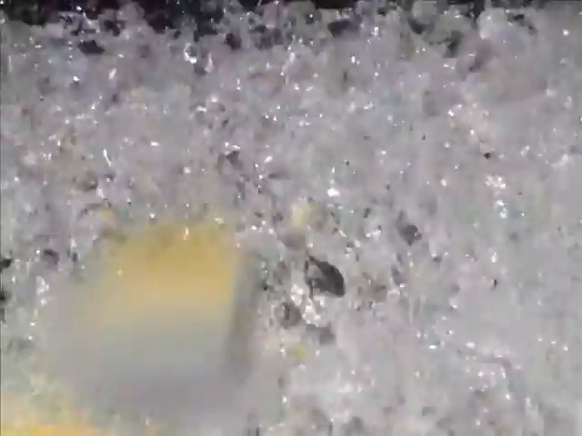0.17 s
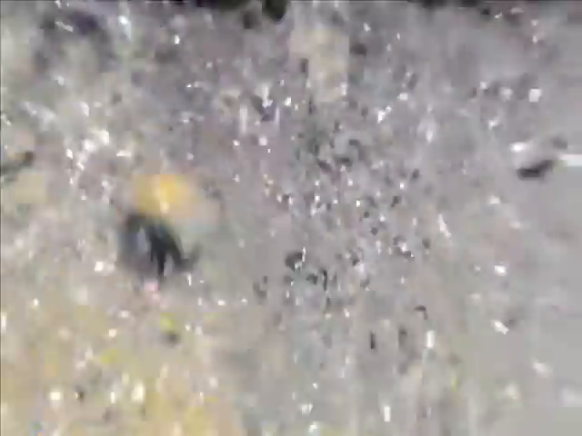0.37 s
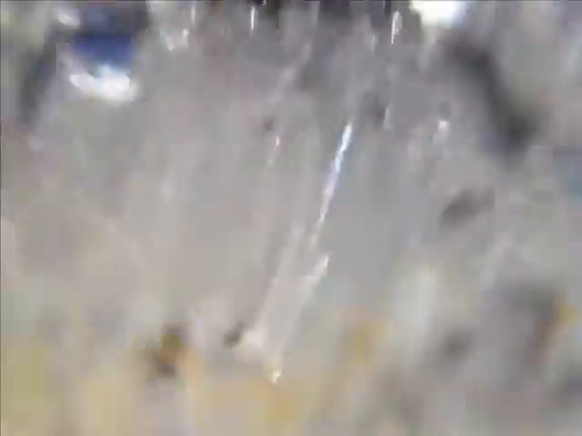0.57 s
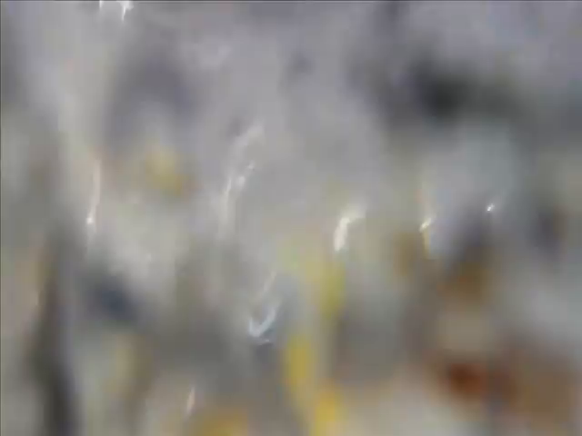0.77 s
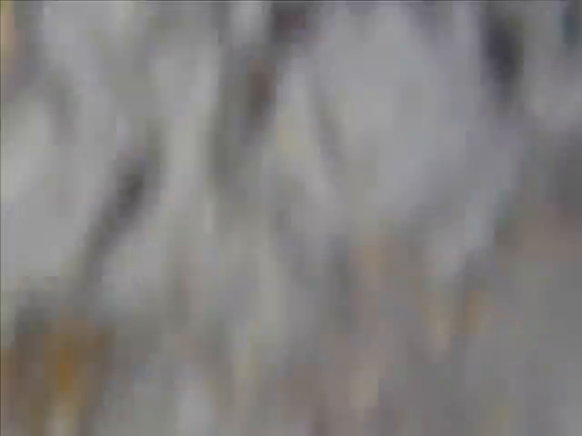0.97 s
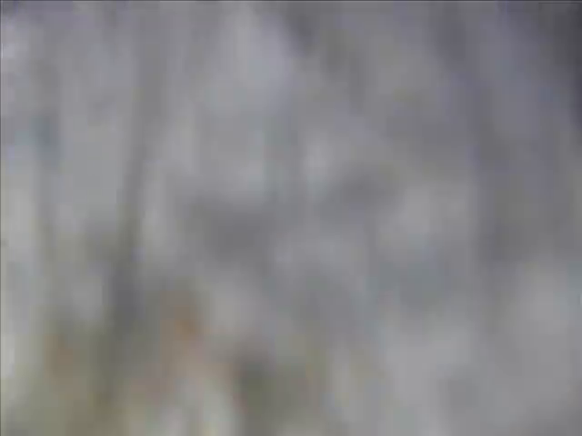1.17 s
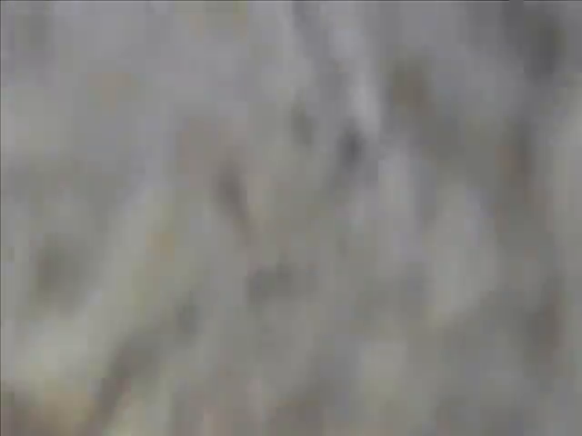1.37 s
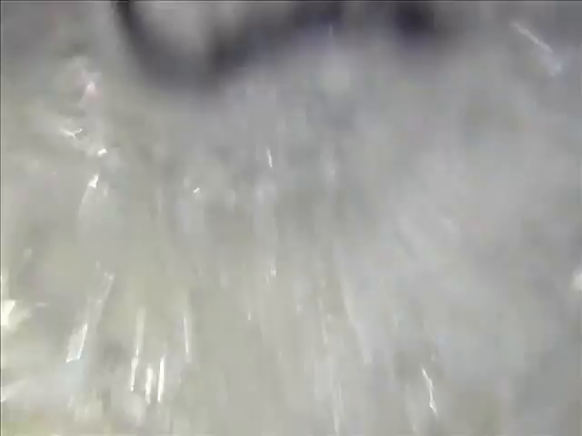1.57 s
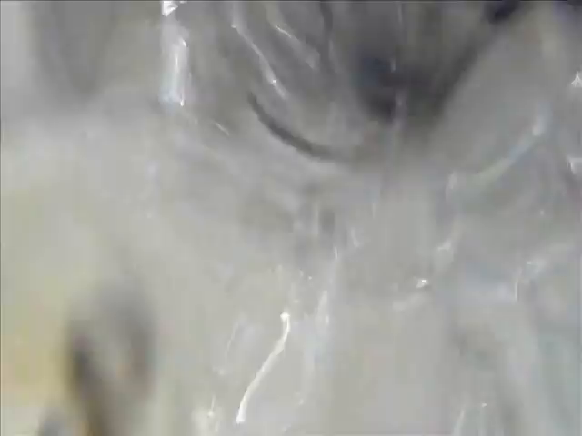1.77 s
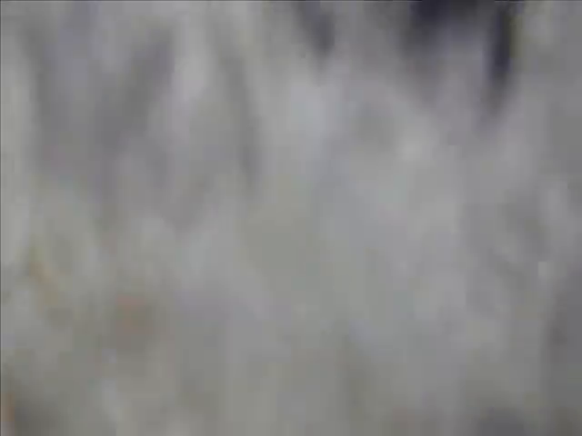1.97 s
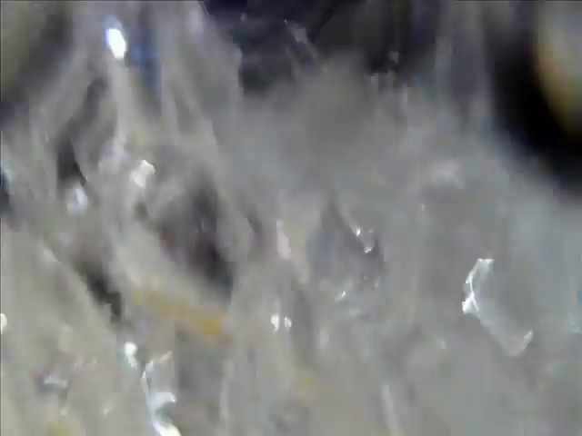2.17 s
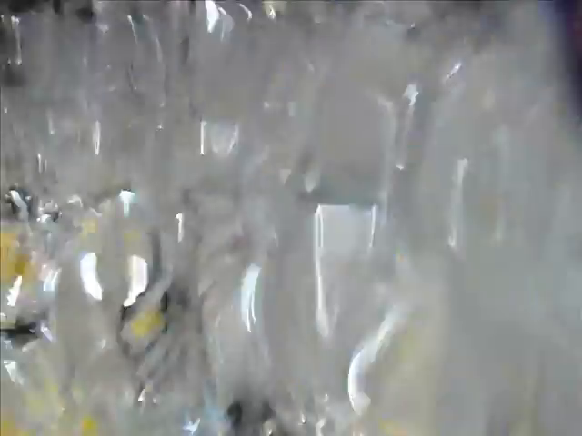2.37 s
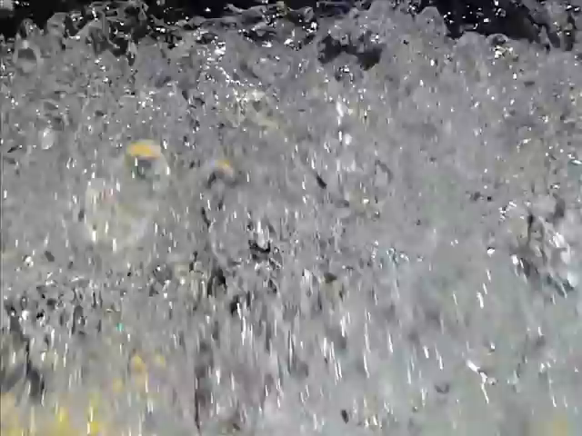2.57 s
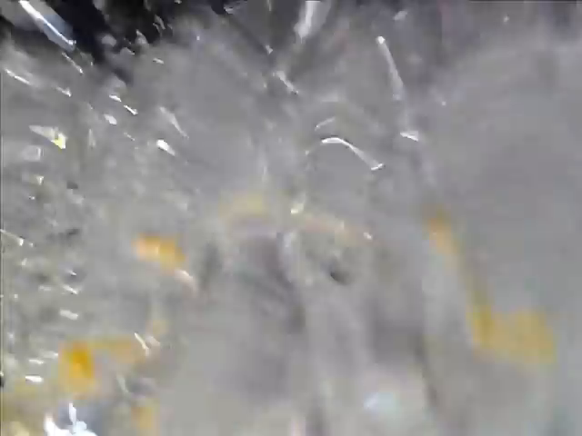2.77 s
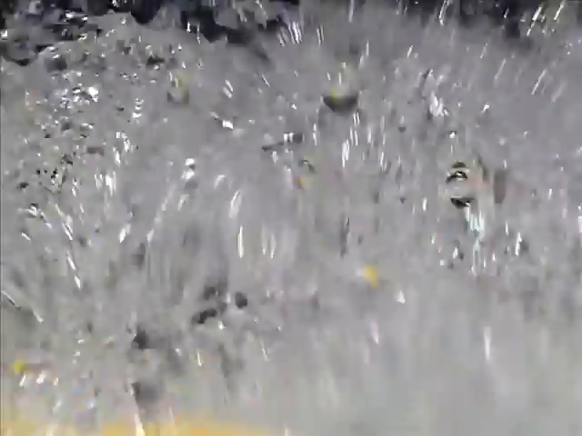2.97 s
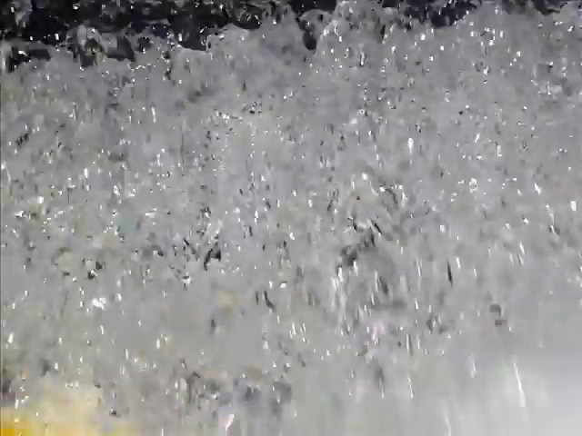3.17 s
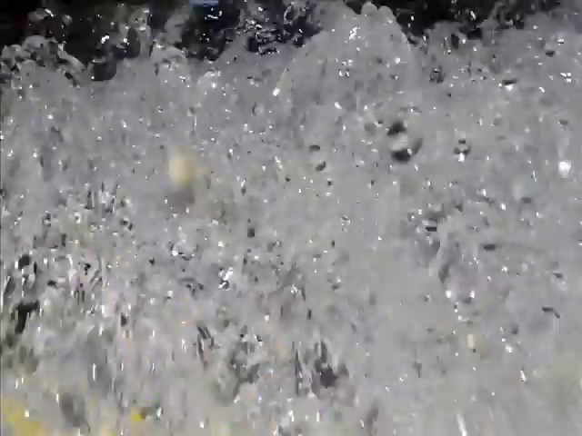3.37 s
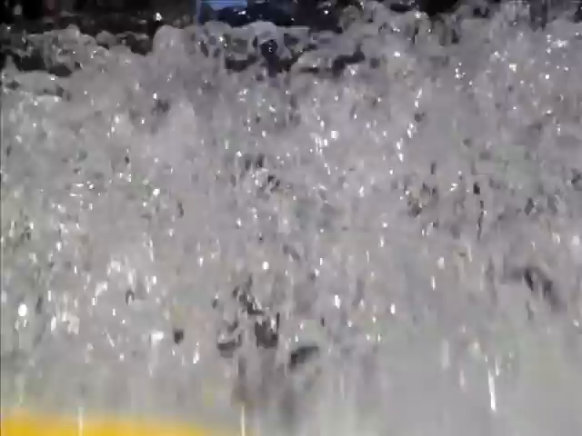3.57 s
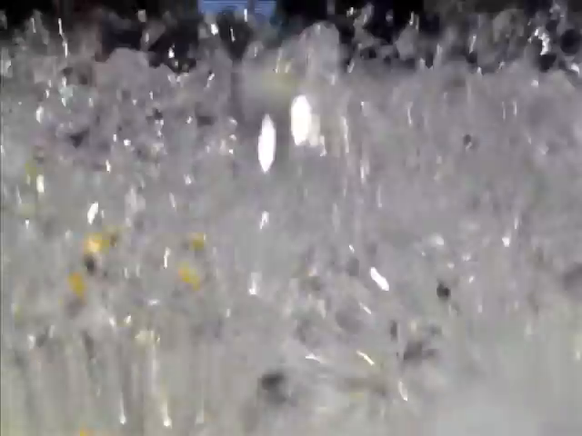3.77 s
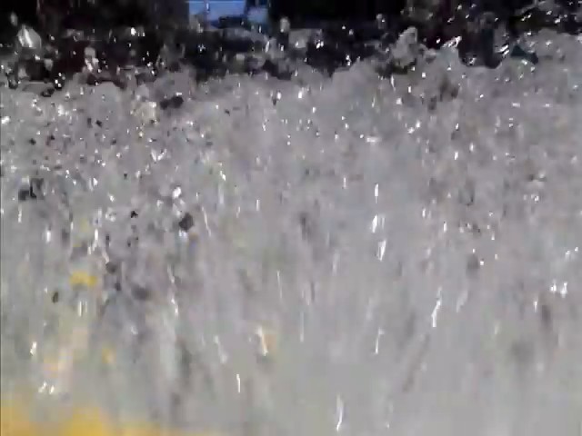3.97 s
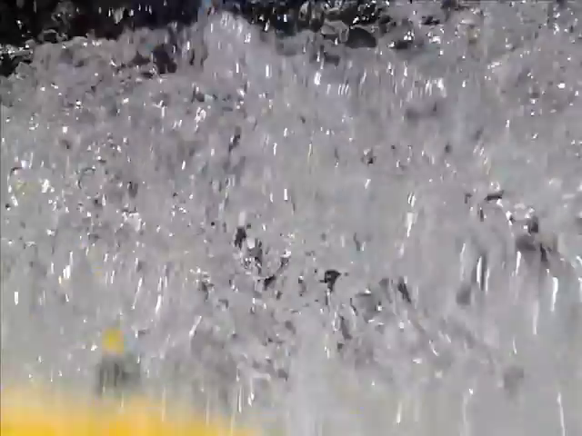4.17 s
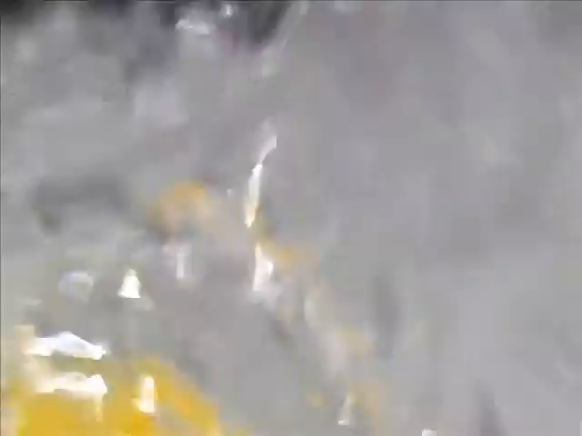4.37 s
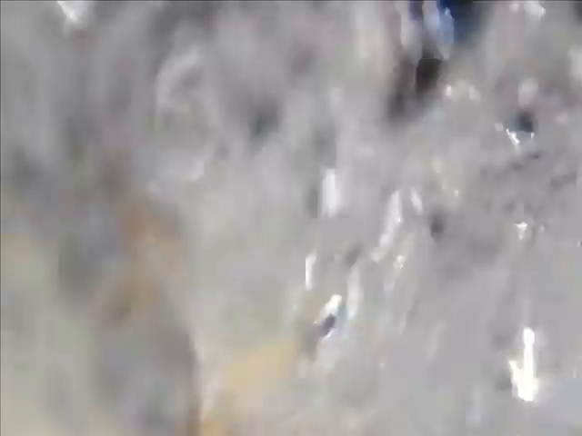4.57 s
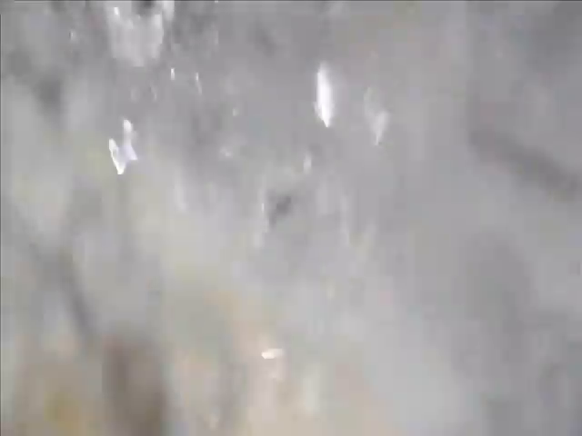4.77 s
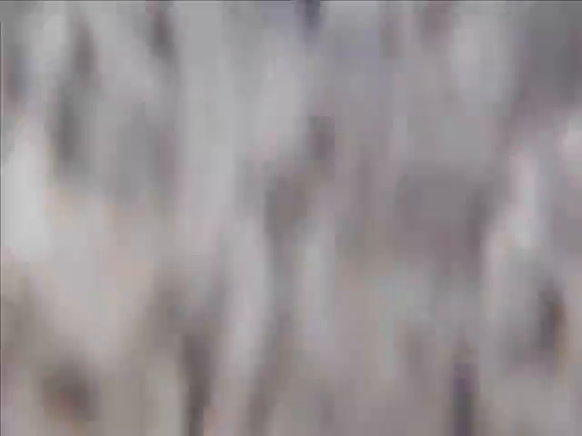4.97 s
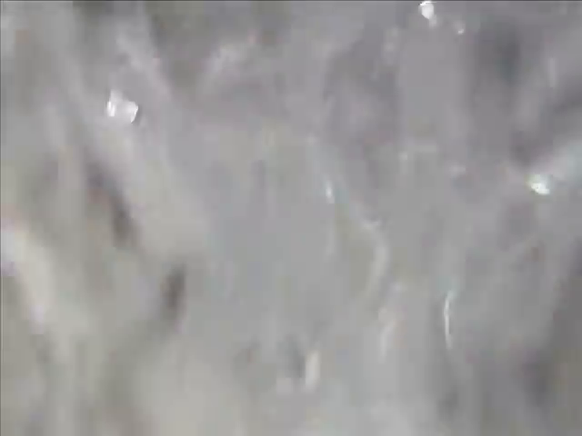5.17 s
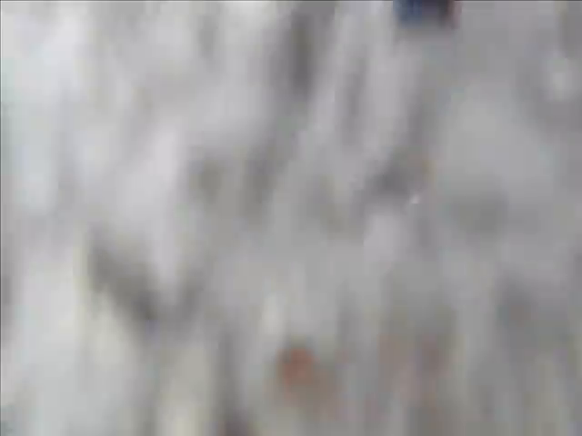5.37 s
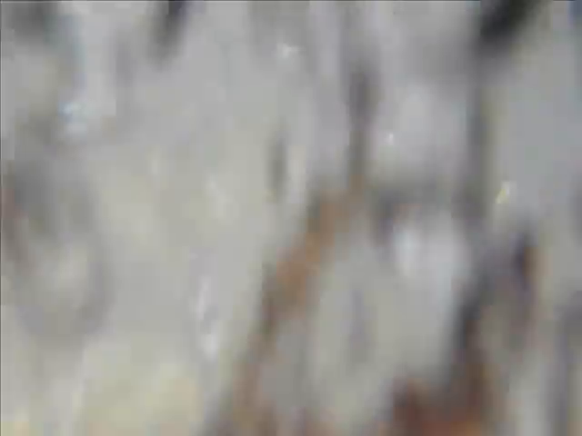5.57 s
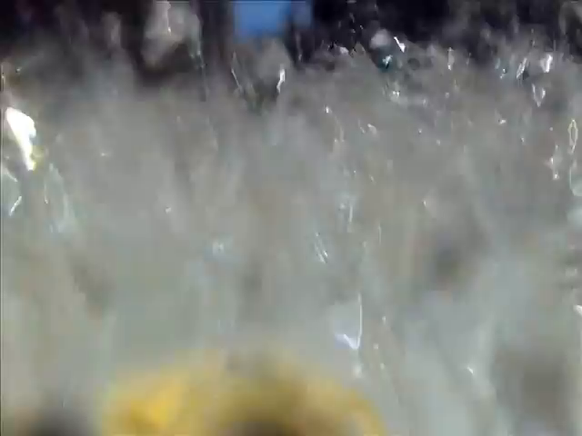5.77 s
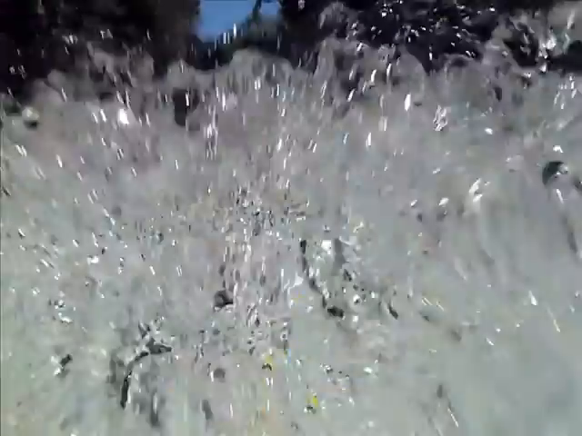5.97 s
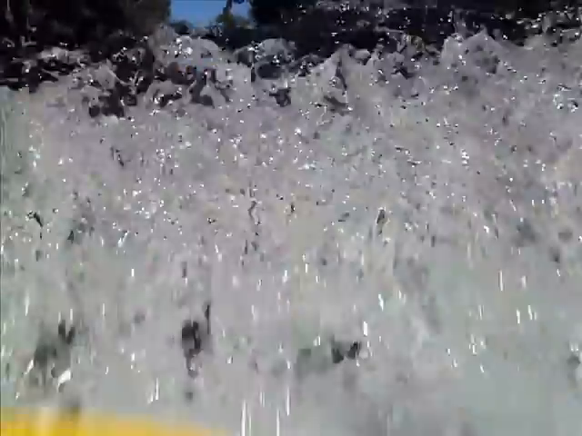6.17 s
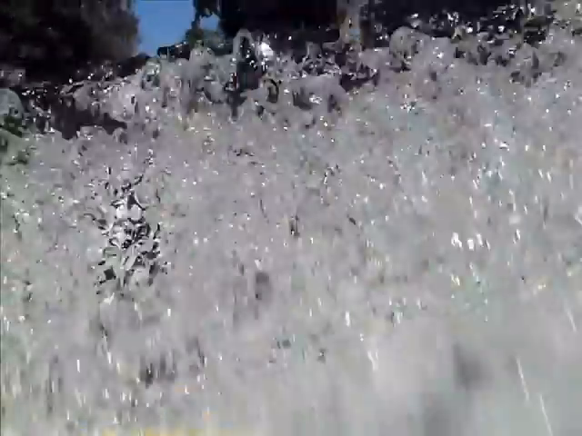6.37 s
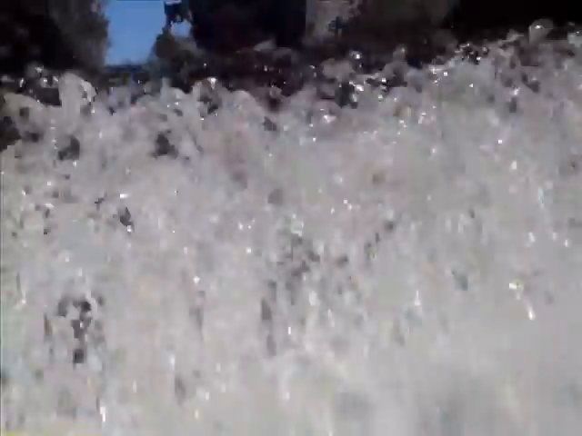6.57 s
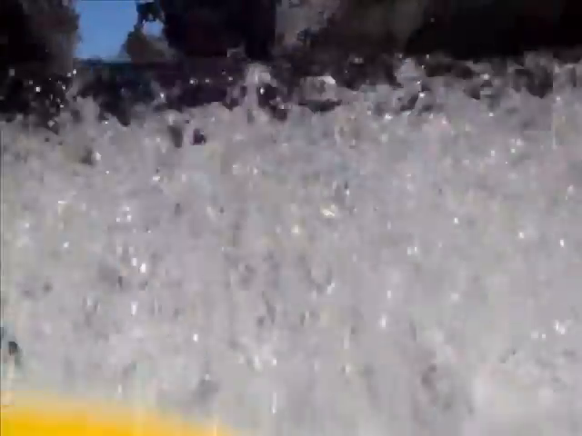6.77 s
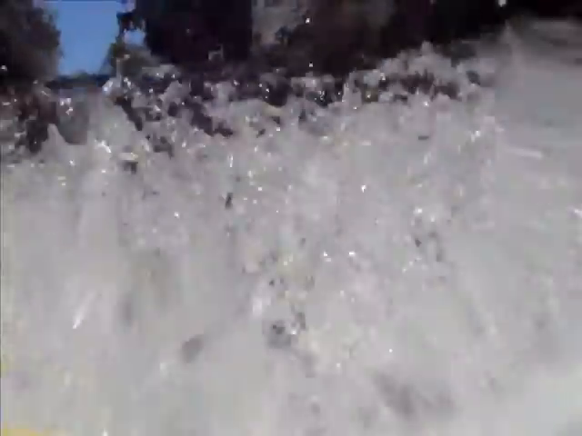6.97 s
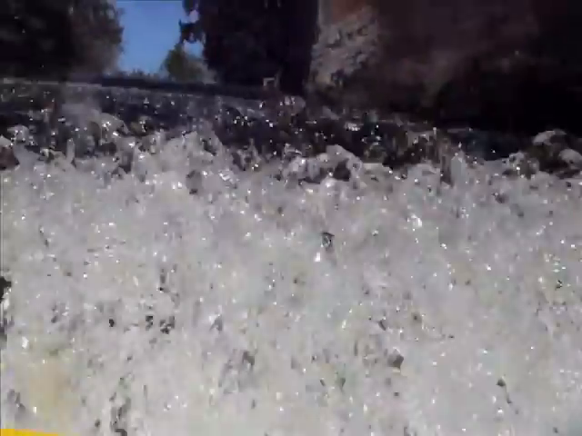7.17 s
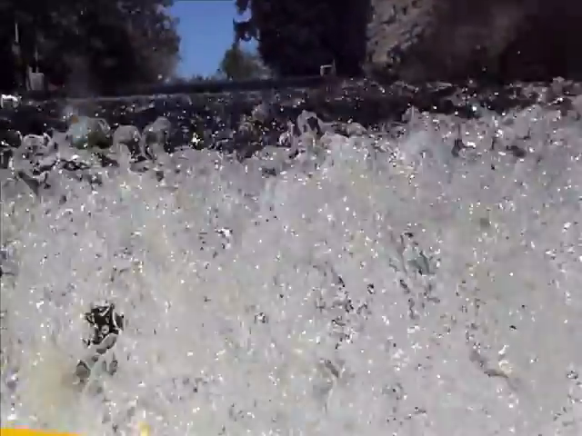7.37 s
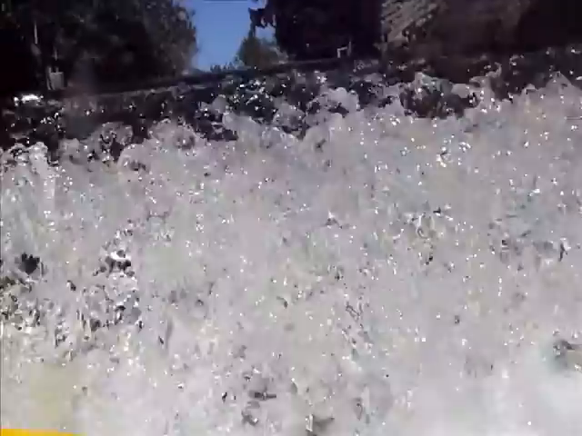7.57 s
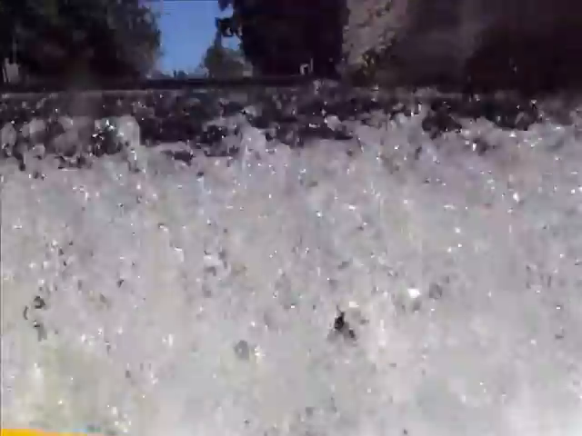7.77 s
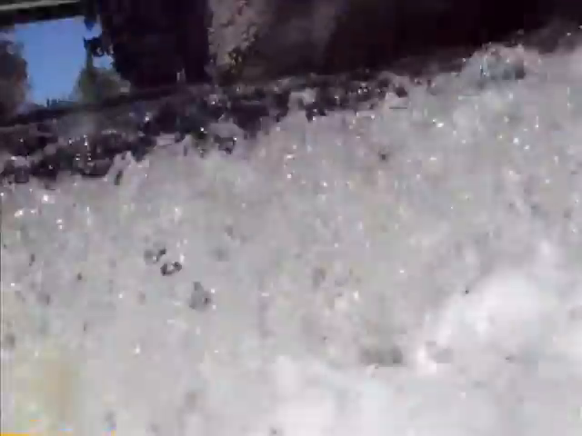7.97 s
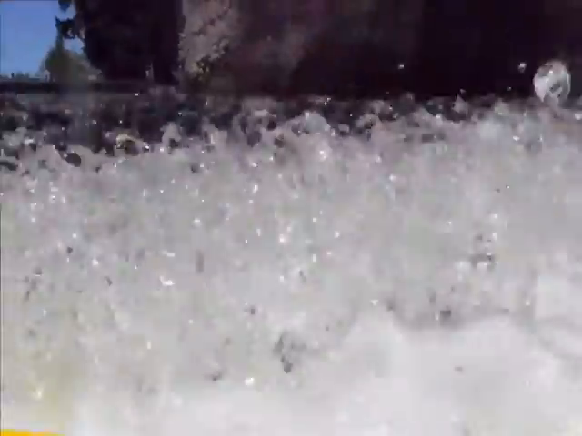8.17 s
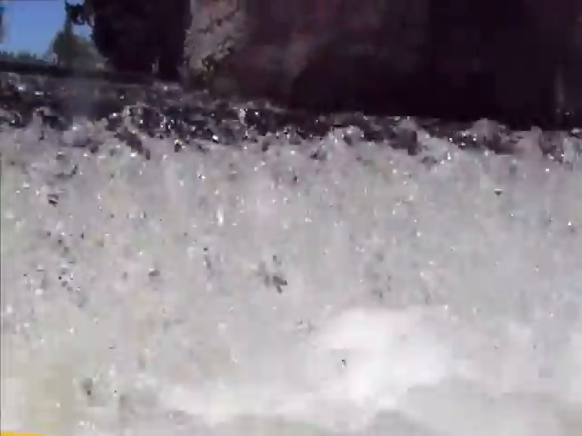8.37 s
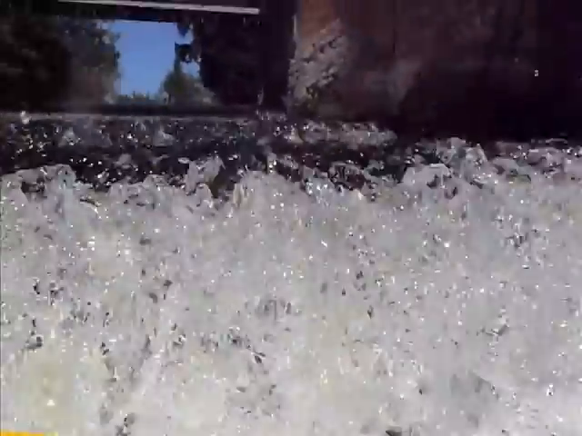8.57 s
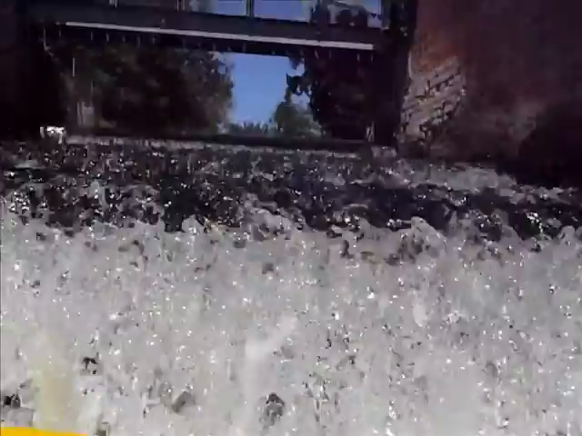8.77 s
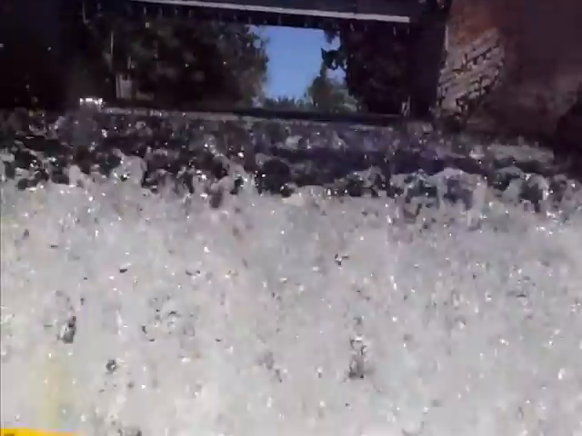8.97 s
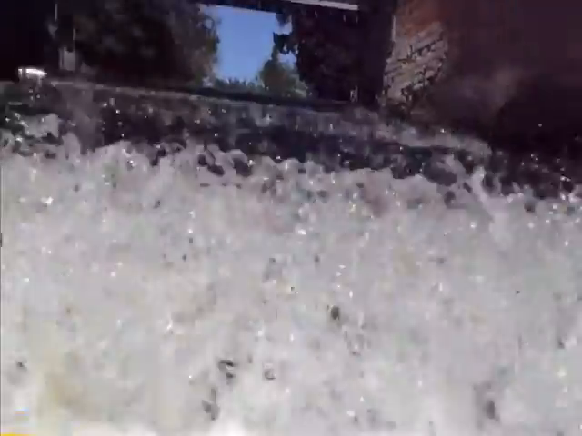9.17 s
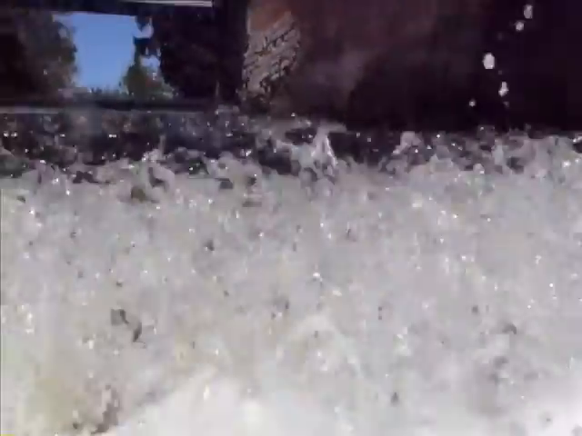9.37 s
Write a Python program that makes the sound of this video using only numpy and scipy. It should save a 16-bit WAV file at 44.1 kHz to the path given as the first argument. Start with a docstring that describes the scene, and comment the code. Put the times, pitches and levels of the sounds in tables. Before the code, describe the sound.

White water roars at a foaming weir while two surges slap and splash over the microphone housing, crackling harshly, gurgling and glugging, then settle to steady rushing.

```python
"""River weir from just above the foam

White water roars over a river weir, heard through the port of a waterproof housing held just above the foam.
Filtered noise makes the roar and the low buffeting; twice the foam surges over the housing, with a small surge between.
Slaps and single splashes ring the housing and overload the microphone into a harsh crackle.
Gliding sines make the air pockets glug, short resonances the gurgles and droplets; films of water muffle the port."""
import sys
import numpy as np
from scipy import signal
from scipy.io import wavfile
from scipy.ndimage import uniform_filter1d

SR = 44100
rng = np.random.default_rng(int(sys.argv[2]) if len(sys.argv) > 2 else 0)


def to_wav(sig):
    """Store sig (one row per channel, or 1-D mono) as 16-bit WAV at the path in sys.argv[1].

    Samples outside -1..1 are clipped; the rate is SR.
    """
    pcm = np.clip(np.atleast_2d(sig), -1, 1) * 32767
    pcm = np.round(pcm).astype(np.int16)
    wavfile.write(sys.argv[1], SR, pcm.T)  # frames by channels


N = 415863
TIME = np.arange(N) / SR

# foam washing round the housing, two long surges with a small one between: start_s, force_db
WASH = [(0, -39.5), (.8, -42.5), (.95, -23), (1.4, -21), (1.85, -17), (2.2, -22.5), (2.3, -27.5),
        (2.6, -44.5), (2.87, -30), (3.05, -44.5), (4.3, -50.5), (4.62, -25), (4.8, -23), (5.62, -22),
        (5.88, -37.5), (5.96, -50), (6.3, -66), (9.43, -81)]
# sheets of water that slap the housing and stream over it: start_s, length_s, force_db,
# push_db (weight of the low push, relative to the force)
SLAPS = [(0.473, 0.03, -3, 6.5), (0.565, 0.065, -1, 12.5), (0.678, 0.061, -12, 9), (0.835, 0.033, -1, 2),
         (0.968, 0.016, -9, -10), (1.002, 0.04, -1, 1), (1.056, .079, -1, -2), (1.238, 0.052, -2, -1),
         (1.295, 0.057, -21.5, 16.5), (1.358, 0.062, -3.5, -4.5), (1.472, 0.068, 1, -6.5),
         (1.591, 0.04, -22.5, 20), (1.665, 0.021, -8, -3), (1.753, 0.094, 4.5, 0), (1.859, 0.039, 1, -14),
         (1.955, 0.021, -3, 9), (2.004, 0.052, -2.5, -6), (2.084, 0.049, -7.5, -9), (2.213, 0.052, -1, 6),
         (2.807, 0.028, -19, 0.5), (2.908, 0.03, -22.5, 11), (2.958, 0.0094, -20, 4),
         (4.528, .023, -6.5, -5), (4.628, 0.033, -20.5, 5), (4.723, .012, -11, 10),
         (4.773, 0.028, -9.5, -9), (4.894, .105, -5.5, -3), (5.019, 0.023, -15, 10.5), (5.07, 0.073, -3, 2),
         (5.153, 0.12, -9, -27), (5.347, 0.067, -8.5, -3), (5.482, 0.06, -5.5, -3.5),
         (5.567, 0.059, -3, -7), (5.699, 0.055, -10.5, -6.5), (5.854, 0.059, -27.5, 17)]
# single flung drops that burst on the housing, all equally brief: start_s, force_db, push_db (as for the slaps)
SPLATS = [(.317, -7.5, -15), (.898, 5.5, 10), (1.166, 0, 5), (1.213, -5, 2), (1.458, -10, -1),
          (2.296, -6, -19), (2.377, 7, 2), (3.094, -8, -4), (3.397, 7, 0.5), (3.433, -27, 2),
          (3.466, -7, -13), (3.585, -8.5, -17), (3.677, -0.5, 2), (3.814, -12.5, -5), (3.841, -14.5, 9),
          (3.855, -3, 7), (3.989, -13, -22), (4.072, 1.5, 2), (4.188, -19, 3), (4.364, -8.5, 2),
          (4.386, 5.5, -1), (4.752, 6, -6.5), (5.772, -16, -3), (5.841, -6, -3), (5.995, -32, 22.5),
          (6.163, -15, -8), (7.979, -15, 15)]


def from_db(db):
    """Decibels to gain."""
    return 10 ** (np.asarray(db) / 20)


def rms_one(x):
    """Scale to rms 1."""
    return x / np.sqrt(np.mean(x ** 2) + 1e-20)


def level(rows):
    """Gain at every sample, from rows of time in s and level in dB."""
    return from_db(np.interp(TIME, *np.transpose(rows)))


def drift(rate_hz):
    """Slow random wander of rms 1: noise twice through a one-pole low-pass, made at a twentieth of the sample rate."""
    pole = np.exp(-40 * np.pi * rate_hz / SR)
    noise = rng.standard_normal(N // 20 + 3002)
    slow = signal.lfilter([1], [1, -2 * pole, pole * pole], noise)[3000:]  # past the settling of the filter
    return np.interp(np.arange(N) / 20, np.arange(len(slow)), rms_one(slow))


def cut(x, hz, kind, order=2):
    """Butterworth filter."""
    sections = signal.butter(order, np.minimum(hz, .47 * SR), kind, fs=SR, output="sos")
    return signal.sosfilt(sections, x)


def resonate(x, hz, width_hz):
    """Two-pole resonance with gain 1 at its peak."""
    radius = np.exp(-np.pi * width_hz / SR)
    zeros = np.array([1, 0, -1]) * (1 - radius * radius) / 2
    poles = [1, -2 * radius * np.cos(2 * np.pi * hz / SR), radius * radius]
    return signal.lfilter(zeros, poles, x + 1e-18)


def even(x, window_s=.004):
    """Hold the level of a ringing near 1 from moment to moment."""
    power = uniform_filter1d(rms_one(x) ** 2, int(window_s * SR))
    return rms_one(x / np.sqrt(np.abs(power) + .05))


def grains(per_s, spread_db):
    """Random clicks of very uneven size and either sign; rms 1."""
    sizes = from_db(spread_db * np.minimum(rng.exponential(1, N), 5))
    sizes = sizes * rng.choice([-1, 1], N)
    return rms_one(sizes * (rng.random(N) < per_s / SR))


def churn(sources, colour, patchy_db, patchy_hz, count):
    """Bands of two unrelated sources, dealt in turn, each swelling on its own; rms 1."""
    hz, db = np.transpose(colour)
    edges = np.geomspace(hz[0], hz[-1], count + 1)
    out = 0
    for k, (low, high) in enumerate(zip(edges, edges[1:])):
        band = cut(sources[k % 2], [low, high], "band")
        band_db = np.interp(np.log(low * high) / 2, np.log(hz), db)
        out = out + band * from_db(band_db + patchy_db * drift(patchy_hz))
    return rms_one(out)


def surge_events(per_s):
    """Random moments inside the surges, as rows of start_s, wash_db and two chance values between -1 and 1."""
    surge_above_db = -26  # wash that counts as a surge
    chance = rng.random((int(100 * N / SR), 4))  # 100 candidates a second
    times = chance[:, 0] * TIME[-1]
    wash_db = np.interp(times, *np.transpose(WASH))
    happens = (chance[:, 1] < per_s / 100) & (wash_db > surge_above_db)
    return np.column_stack([times, wash_db, 2 * chance[:, 2:] - 1])[happens]


def weir():
    """Countless bubbles burst in the fall and merge into a heaving roar, coloured by the housing."""
    # the weir from the water's edge: start_s, level_db
    roar_level = [(0, -42), (.4, -29), (2.4, -34), (3.3, -34), (4.5, -33.5), (6.0, -38), (6.55, -30),
                  (6.9, -31.5), (7.7, -29), (7.95, -30.5), (8.3, -25.5), (8.75, -31), (9.0, -26),
                  (9.43, -31.5)]
    # colour of the roar inside the housing: pitch_hz, density_db (per Hz)
    roar_colour = [(100, 3.5), (200, -1.5), (330, 0.5), (600, 1.5), (850, -4.5), (1200, -2.5), (1550, 2),
                   (1780, 5), (2150, -21), (2900, -21.5), (3900, -26.5), (4900, -51), (7800, -38.5),
                   (16000, -41.5)]
    # thin resonances of the housing: pitch_hz, width_hz, lift_db
    housing_modes = [(1775, 57, 3.5), (5750, 730, 11.5), (9540, 400, 8.5), (10500, 200, 8),
                     (13600, 510, 9.5), (15100, 600, 5)]
    bursts = [grains(per_s=14000, spread_db=5.0) for _ in range(2)]
    roar = churn(bursts, roar_colour, patchy_db=.8, patchy_hz=25, count=30)
    for hz, width_hz, lift_db in housing_modes:
        roar = roar + (from_db(lift_db) - 1) * resonate(roar, hz, width_hz)
    heave_db = 1.5 * drift(13)
    return roar * level(roar_level) * from_db(heave_db)


def buffet():
    """The air that the fall drags along swings in lumpy low pressure, gusting; a deeper sway also grows with the wash."""
    # colour of the buffeting: pitch_hz, density_db (per Hz)
    buffet_colour = [(8.8, -24), (15, -9), (60, 2.5), (71, 1.5), (92, -7.5), (124, -9), (220, -27),
                     (290, -53), (480, -120)]
    # gusts of that air, all of one shape: centre_s, lift_db
    gust_rows = [(.72, 12), (2.0, 4.5), (2.95, -0.5), (3.38, 3), (4.75, 6.5), (6.59, 5.5), (6.77, 3.5),
                 (7.85, 0.5), (8.69, 6.5), (9.11, 4), (9.27, 8)]
    gust_s = 0.058  # from the centre of a gust to half its lift in dB
    away_db, full_wash_db = -27, -9.5  # level away from the foam, level added by a wash of 0 dB
    follows = .42  # share of the wash's swing in dB that the added level follows
    rumble = churn(rng.standard_normal((2, N)), buffet_colour, patchy_db=1.0, patchy_hz=3.2, count=12)
    sway = rms_one(cut(rng.standard_normal(N), [14, 36], "band"))
    wash = level(WASH)
    strength = np.hypot(from_db(away_db), from_db(full_wash_db) * wash ** follows)
    gust_db = sum(lift_db / (1 + ((TIME - at) / gust_s) ** 4) for at, lift_db in gust_rows)
    return rumble * strength * from_db(gust_db) + sway * wash ** 0.25 * from_db(-13.5)


def pops(low_hz, high_hz, per_s, cycles, count):
    """Bubbles or droplets of all sizes, each ringing for a few cycles, the higher the weaker; rms 1."""
    out = 0
    for hz in np.geomspace(low_hz, high_hz, count):
        births = grains(per_s / count, spread_db=3)
        width_hz = np.log(1000) / np.pi * hz / cycles  # falls 60 dB in that many cycles
        ringing = resonate(births, hz, width_hz)
        out = out + rms_one(ringing) * np.sqrt(low_hz / hz)
    return rms_one(out)


def gurgles():
    """Bubbles in the wash ring low, as strong as the wash."""
    bubbles = pops(low_hz=210, high_hz=650, per_s=45, cycles=15, count=10)
    return bubbles * level(WASH) * from_db(-4)


def droplets():
    """Droplets ring high and faint, following half the wash's swing in dB."""
    ticks = pops(low_hz=2350, high_hz=11200, per_s=96, cycles=17, count=10)
    return ticks * level(WASH) ** .5 * from_db(-45)


def glugs(rise=0.16):
    """Trapped air rings and climbs in pitch as it nears the surface; pockets squeezed by a surge glide either way."""
    # air pockets and eddies against the port: start_s, pitch_hz (at the start), level_db (at the start)
    glug_rows = [(2.555, 447, -12.5), (3.400, 706, 0.5), (3.435, 313, -21.5), (3.472, 537, -7.5),
                 (3.684, 527, -7), (4.191, 337, -14.5), (5.996, 189, -25), (7.833, 103, -14),
                 (7.982, 71.6, -7), (9.255, 132, -15)]
    ring_cycles = 20.5  # cycles of the starting pitch in a fall of 60 dB
    # pockets: middle pitch, range either side, level over the wash, largest glide (as for rise)
    pocket_hz, pocket_octaves, pocket_db, pocket_glide = 724, 1.293, 12, 0.32
    pockets = [(start, pocket_hz * 2 ** (pocket_octaves * pitch), wash_db + pocket_db, pocket_glide * squeeze)
               for start, wash_db, pitch, squeeze in surge_events(per_s=32)]
    out = np.zeros(N)
    for start, hz, db, glide in [(*row, rise) for row in glug_rows] + pockets:
        first = int(start * SR)
        t60 = ring_cycles / hz
        age = TIME[:min(int(t60 * SR), N - first)]
        # the pitch itself moves by twice the glide, as a share of where it began
        cycles = hz * age * (1 + glide * age / t60)
        out[first:][:len(age)] += from_db(db - 60 * age / t60) * np.sin(2 * np.pi * cycles)
    return out


def blows():
    """All water that hits the housing, as rows of start_s, length_s, force_db, push_db: slaps, drops, rebounds, strays."""
    splat_s = 0.0021
    rebound_s, rebound_db = .014, -12  # part of a burst drop falls back a moment later
    stray_db, spread_db = 11.5, 7  # force of stray drops over the wash, spread either side
    strays = [(start, wash_db + stray_db + spread_db * size, spread_db * weight)
              for start, wash_db, size, weight in surge_events(per_s=18)]
    rebounds = [(start + rebound_s, db + rebound_db, push) for start, db, push in SPLATS]
    return SLAPS + [(start, splat_s, db, push) for start, db, push in SPLATS + rebounds + strays]


def blow_forces(hits, rise_share, fall_s):
    """Force of the blows on the housing, and of their low push: each swells, holds, then runs off."""
    force, push = np.zeros((2, N))
    for start, length, force_db, weight_db in hits:
        span = slice(int(start * SR), int((start + length) * SR) + SR // 10)
        age = np.maximum(TIME[span] - start, 0)
        swell = 1 - np.exp(-age / (rise_share * length))
        shape = swell * np.exp(-np.maximum(age - length, 0) / fall_s)
        force[span] += shape * from_db(force_db)
        push[span] += shape * from_db(force_db + weight_db)
    return force, push


def splashes(hits, lumpy_db, lumpy_hz, mode_lumpy_db):
    """Blows and clumps of washing foam pelt the housing with drops, ringing its modes; fine spray ticks on top."""
    # what the wet housing rings with: pitch_hz, width_hz, level_db, pushed (1 if driven by the low push)
    wet_modes = [(46.3, 99, -5, 1), (221, 183, -11, 1), (527, 120, -15.5, 0), (1398, 390, -10.5, 0),
                 (1493, 224, -9.5, 0)]
    wash = level(WASH) * from_db(lumpy_db * drift(lumpy_hz))
    ragged_db = 2.6 * drift(100)
    forces = blow_forces(hits, rise_share=.06, fall_s=.0025)
    force, push = np.hypot(forces, wash) * from_db(ragged_db)
    body = 0
    for hz, width_hz, mode_db, pushed in wet_modes:
        drops = grains(per_s=2200, spread_db=6.5)
        ringing = even(resonate(drops, hz, width_hz), 2 / width_hz)
        mode_gain = from_db(mode_db + mode_lumpy_db * drift(18.0))
        body = body + ringing * mode_gain * (push if pushed > .5 else force)
    # water is a soft hammer: only the finest drops reach the treble
    fine_drops = grains(per_s=1800, spread_db=4.5)
    softened = cut(fine_drops, hz=5100, kind="low", order=1)
    spray = rms_one(cut(softened, hz=1520, kind="high"))
    return cut(body, hz=2470, kind="low") + from_db(-20) * force * spray


def cracks(hits, crack_db, contact_hz):
    """Each blow opens with one pressure spike that rings the port."""
    clicks = np.zeros(N)
    for start, _, force_db, _ in hits:
        clicks[int(start * SR)] = from_db(force_db + crack_db)
    spike = signal.lfilter([1], [1, -np.exp(-2 * np.pi * contact_hz / SR)], clicks + 1e-18)
    port_ring = resonate(spike, hz=1602, width_hz=170)
    return cut(spike, hz=4700, kind="low", order=1) + 14.0 * port_ring


def leaning_water(lean_db, lean_s):
    """The water of a long, hard slap leans on the port for a moment and pins the membrane."""
    out = np.zeros(N)
    age = TIME[:SR // 10] / lean_s
    for start, length, force_db, _ in SLAPS:
        weight = from_db(force_db + lean_db) * min(length / .03, 1)  # slaps under 30 ms lean less
        out[int((start + length) * SR):][:len(age)] += weight * age * np.exp(1 - age)
    return out


def open_port(closing_s=0.0016):
    """Share of the sound that passes the films of water; each lasts until it drains or the next listed blow bursts it."""
    # thick films that seal the port and drain: start_s, loss_db, drain_s (time to half the loss)
    seal_rows = [(0.757, 8, 0.052), (1.139, 8, .04), (1.428, 12, 0.028), (1.729, 18, 0.0091),
                 (1.905, 12.5, 0.037), (2.98, 7.5, 0.061), (3.411, 15.5, 0.039), (3.858, 23, 0.026),
                 (4.086, 26, 0.032), (4.758, 13, 0.018), (5.557, 32, 0.007), (5.755, 13, 0.019),
                 (8.017, 19, .12)]
    # in a surge the foam keeps choking the port for an instant, draining in half to twice the middle time
    choke_db, choke_s = 15.5, 0.0055
    chokes = [(start, choke_db, choke_s * 2 ** size) for start, _, size, _ in surge_events(per_s=15)]
    loss_db = np.zeros(N)
    for start, depth_db, drain_s in seal_rows + chokes:
        burst = min([row[0] for row in SLAPS + SPLATS if row[0] > start], default=N / SR)
        span = slice(int(start * SR), int(burst * SR))
        age = np.maximum(TIME[span] - start, 0)
        closing = np.minimum(age / closing_s, 1)
        film_db = depth_db * closing / (1 + (age / drain_s) ** 3)
        loss_db[span] = np.maximum(loss_db[span], film_db)
    return from_db(-loss_db)


def scene():
    """Everything reaches the microphone through the one port; a film of water stops the lows least."""
    hits = blows()
    slaps = splashes(hits, lumpy_db=6.5, lumpy_hz=66, mode_lumpy_db=6.0)
    slaps += cracks(hits, crack_db=-9, contact_hz=1020)
    slaps += leaning_water(lean_db=0.0, lean_s=0.0022)
    bubbling = gurgles() + droplets()
    port = open_port()
    lows = buffet() + glugs()
    mix = (weir() + slaps + bubbling) * port + lows * port ** 0.71
    return mix[None]


def record(dry):
    """The microphone overloads into flat tops, which sag through its coupling capacitor; the top is dulled and cut."""
    overload, knee = 0.41, 3.5  # ceiling of the flat tops, sharpness of the bend towards it
    fine = signal.resample_poly(dry, 2, 1, axis=-1)  # bent at twice the sample rate to limit aliasing
    flat = fine / (1 + np.abs(fine / overload) ** knee) ** (1 / knee)
    # the membrane is never quite pinned: a little treble rides on the flat tops
    ripple = .06 * cut(dry, hz=2500, kind="high", order=1)
    microphone = signal.resample_poly(flat, 1, 2, axis=-1) + ripple
    sagging = cut(microphone, hz=10, kind="high", order=1)
    dull = cut(sagging, hz=12200, kind="low", order=1)
    steep_cut = signal.ellip(10, .2, 80, 15450, fs=SR, output="sos")  # order, ripple dB, stop dB, Hz
    return signal.sosfilt(steep_cut, dull)


dry = scene()
out = record(dry)
to_wav(out)
```